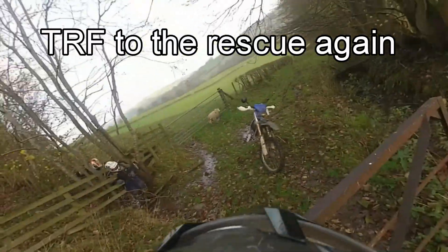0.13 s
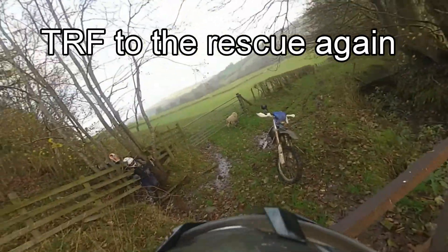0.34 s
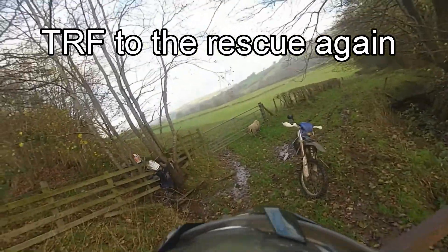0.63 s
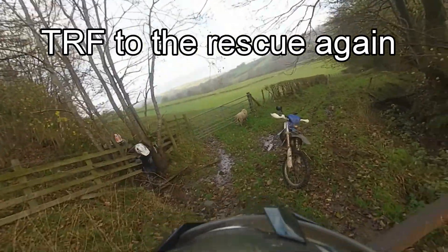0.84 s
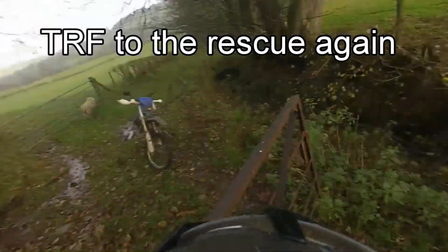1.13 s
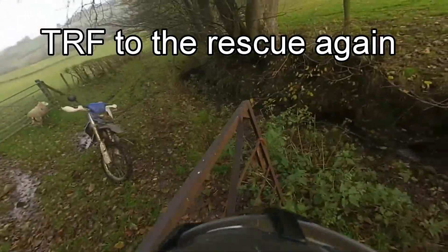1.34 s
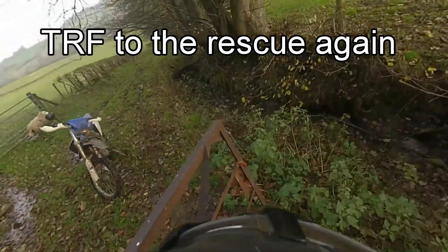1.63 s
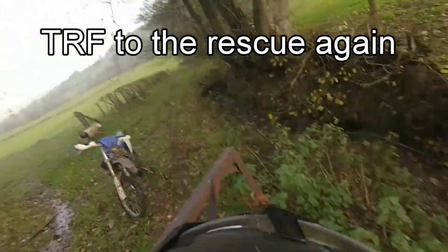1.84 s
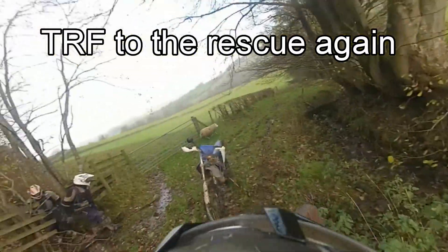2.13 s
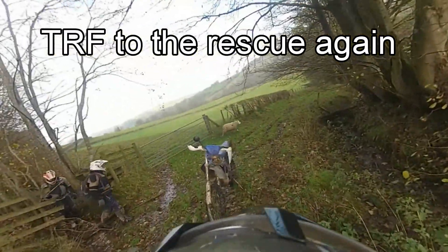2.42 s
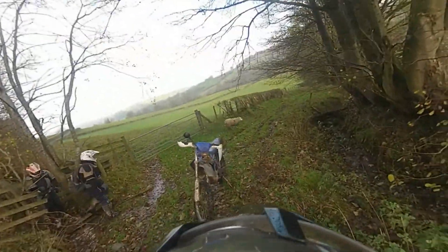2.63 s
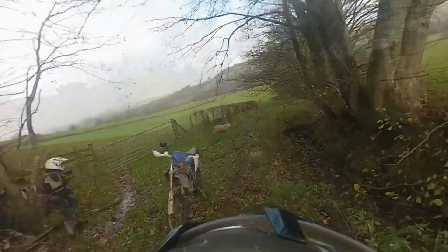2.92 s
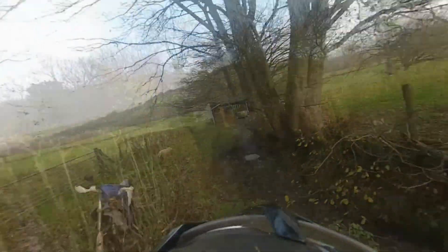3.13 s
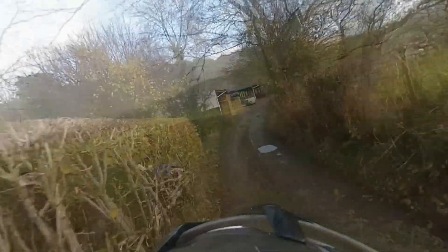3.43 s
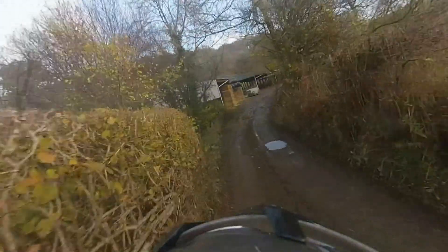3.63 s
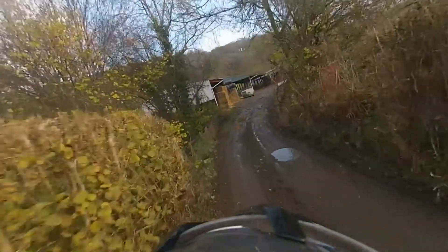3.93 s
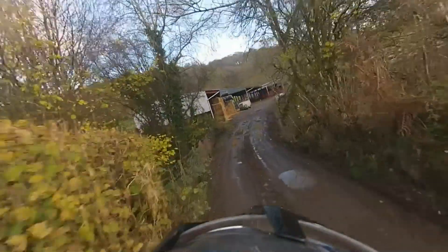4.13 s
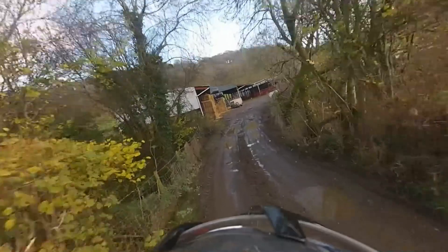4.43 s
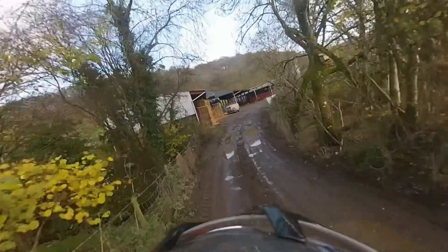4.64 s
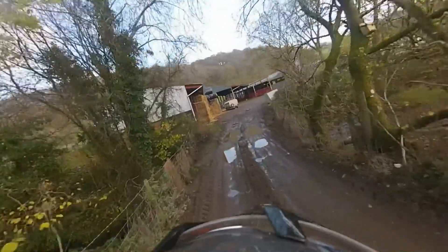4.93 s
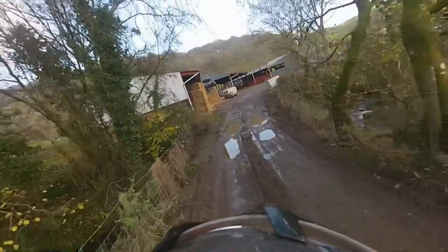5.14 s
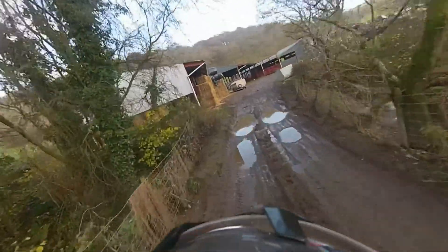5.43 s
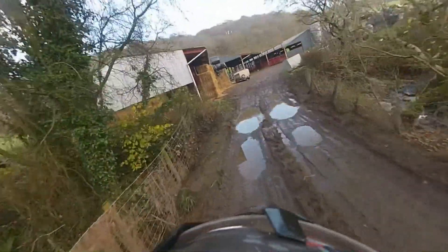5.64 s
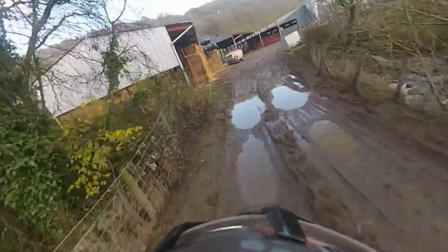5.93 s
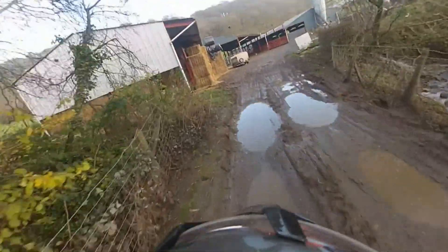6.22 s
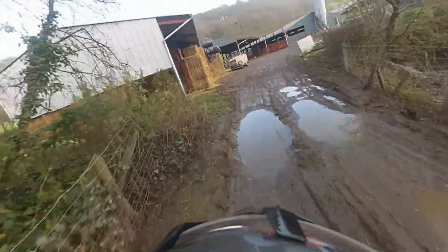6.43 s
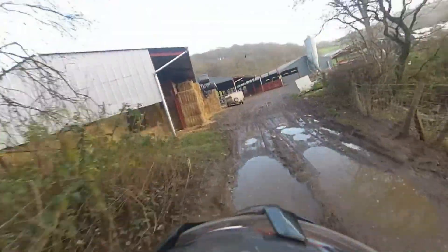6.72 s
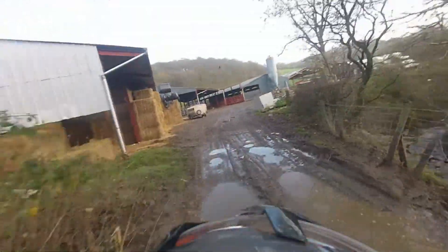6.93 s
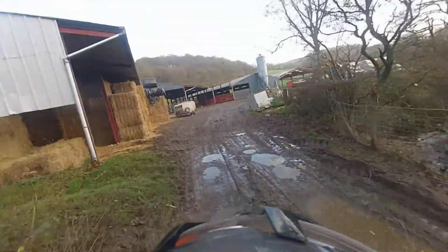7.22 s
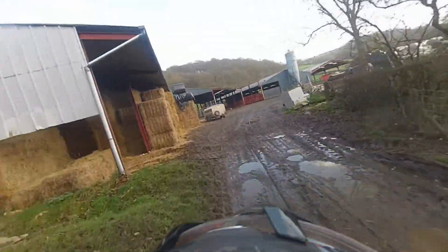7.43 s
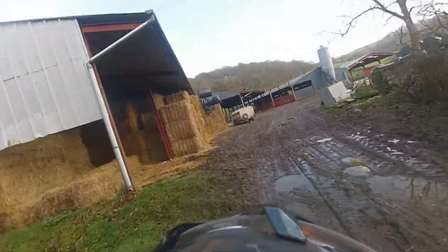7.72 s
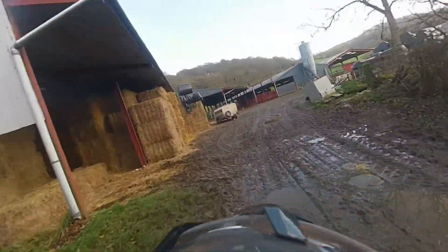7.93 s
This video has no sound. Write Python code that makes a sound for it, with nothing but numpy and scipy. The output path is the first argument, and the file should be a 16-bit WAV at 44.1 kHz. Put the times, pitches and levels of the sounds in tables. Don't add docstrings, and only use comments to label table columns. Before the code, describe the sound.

Outdoors, close to the rider, a lean single-cylinder engine idles with weak and missed beats, about seventeen puffs a second. A smooth blend brings the same engine pulling slowly along a muddy lane, faster at around twenty beats a second, brighter and much louder, with rattling cases, hiss and lumpy wind. The helmet camera in its box gives a mono, boxy, lo-fi tone that ends without the engine stopping.

```python
import sys
import numpy as np
from scipy import signal
from scipy.fft import rfft, irfft, next_fast_len
from scipy.io import wavfile
from scipy.ndimage import uniform_filter1d, map_coordinates

SR = 44100
rng = np.random.default_rng(int(sys.argv[2]) if len(sys.argv) > 2 else 0)


def amplitude_ratio(level_db):
    exponent = np.asarray(level_db, float) / 20
    return 10 ** exponent


def store_pcm(level_fs):
    pcm = np.round(np.clip(level_fs, -1, 1) * 32767).astype(np.int16)
    wavfile.write(sys.argv[1], SR, np.atleast_2d(pcm).T)


N = 355887

# time in seconds, engine cycles done.
IDLE_CRANK = [(-0.013, 0), (0.29, 5), (0.931, 16), (1.167, 20), (1.42, 24), (1.606, 27), (2.392, 40),
              (3.408, 57)]
RIDE_CRANK = [(2.945, 0), (4.064, 23), (4.654, 35), (5.313, 48), (5.785, 57), (6.106, 63), (6.44, 69),
              (6.709, 74), (6.876, 77), (7.288, 84), (8.082, 98)]
# time in seconds, loss in dB.
IDLE_MISFIRES = [(-0.013, 17), (0.108, 6), (0.408, 9), (0.698, 9.5), (0.931, 2), (1.048, 1), (1.229, 14),
                 (1.356, 16.5), (1.726, 2.5), (2.03, 11), (2.392, 19.5), (2.513, 3.5), (2.929, 13)]
RIDE_MISFIRES = [(3.091, 2), (3.189, 4.5), (3.286, 4.7), (3.384, 3.3), (3.432, 7.4), (3.578, 3.5),
                 (3.627, 4.1), (3.724, 11), (3.822, 13), (3.92, 3), (3.969, 8), (4.114, 9.4), (4.213, 7.5),
                 (4.311, 7), (4.507, 7.7), (4.605, 3.3), (4.705, 6), (4.805, 2.7), (5.008, 4.5),
                 (5.11, 5.2), (5.365, 15), (5.47, 4), (5.733, 3), (5.946, 6.5), (6.052, 1.2), (6.162, 1.5),
                 (6.327, 1.3), (6.655, 5.9), (6.764, 2), (6.934, 8.9)]
# time in seconds, load in dB.
LOAD = [(2.9, -9), (3.45, -5.5), (3.8, -1.5), (4.3, -2), (4.75, -1.5), (5.3, -2.5), (5.7, -2.5),
        (6.05, -1.5), (6.3, -1.5), (6.8, 1), (7.1, -0.5), (7.4, 1), (7.8, 1), (8.07, 0)]

# crank angle as share of a cycle, length as share of a cycle,
# pipe note in Hz, decay in seconds, level in dB, phase lead in turns.
IDLE_PUFFS = [
    (-0.048, 0.326, 126, 0.028, 2, 0.068),
    (0.2606, 0.44, 125, 0.01, 5, 0.57),
    (0.02, 0.51, 79, 0.03, -8, 0.51),
]
RIDE_THUMP = [
    (0.0017, 0.52, 170, 0.0092, -3, 0),
    (0.254, 0.4, 155.5, 0.0099, -7.5, 0.063),
    (0.011, .5, 91, 0.0077, -11.5, 0.16),
]
RIDE_RING = [
    (0.0017, .23, 257, 0.017, -3.0, 0),
    (0.2515, 0.228, 241, 0.013, -4.0, 0.0021),
    (-0.1995, 0.24, 348, 0.012, -9, 0.021),
]

# crank angle as share of a cycle, level in dB.
IDLE_KNOCKS = [(-.05, 2.5), (.125, 1)]
GEAR_KNOCKS = [(-.29, 0), (.31, -6)]
RIDE_KNOCKS = [(-.22, -2), (-.03, -6.5), (.24, 3.5), (0.398, -2.5)]
VALVE_TICKS = [(-.29, -7), (-.2, -9), (.05, -10.5), (.5, -12)]
# pitch in Hz, width in Hz (wider dies sooner), level in dB.
CASES = [(448.2, 40.4, 0), (483.4, 22.8, -6.5), (550.4, 30.3, -6), (645, 46, -20.5), (863, 20, -31.5)]
COVERS = [(555.4, 43, 1), (630, 52, -13), (846, 50, -20.5)]
HEAD = [(1100, 200, -3), (1930, 210, -3), (2155, 73, -6.5), (2840, 180, 3), (4600, 880, -21.5)]

# frequency in Hz, level in dB per Hz.
IDLE_ROAR = [(40, -20), (70, -24), (130, 2.5), (200, -24), (320, -11.5), (500, 0), (700, -16.5),
             (900, -24.5), (1100, -44)]
RIDE_ROAR = [(40, -22), (80, -3.5), (160, -1), (280, -2), (400, -6.5), (480, -6.5), (700, -15.5),
             (900, -47), (1100, -59)]
IDLE_HISS = [(470, -25), (800, -0.5), (870, 9), (962, -53), (1130, -5.5), (1730, -10), (1910, -4),
             (2870, -7.5), (3310, -11), (4590, -12.5), (5900, -25.5), (7670, -64), (13000, -120)]
RIDE_HISS = [(470, -30), (800, 0), (884, 1.5), (994, -6), (1320, -1.5), (1510, -4.5), (2430, -3), (2850, 2),
             (3570, -7.5), (4750, -6.5), (5900, -21.5), (7670, -57), (13000, -120)]

# time in seconds, rise of the hiss in dB.
JOLTS = [(1.65, 5), (2.67, 2), (4.76, 1.5), (6.07, 1), (7.64, 1.5), (7.77, 3.5)]
# time in seconds, level in dB.
WIND = [(0.0, -53), (0.85, -68), (1.06, -44), (1.26, -61), (2.13, -78), (2.22, -48), (2.4, -60),
        (2.85, -62), (3.5, -42.5), (5.15, -40.5), (5.53, -39), (5.68, -46), (5.91, -43), (6.5, -56),
        (6.94, -47), (7.3, -60), (7.8, -40), (8.07, -49)]
# time in seconds, share of the riding scene.
FADE = [(2.83, 0.035), (3.42, 0.96)]


def in_time(rows):
    s, *columns = np.transpose(rows)
    return [np.interp(np.arange(N) / SR, s, column) for column in columns]


def rms_one(x):
    return x / np.sqrt(np.mean(x ** 2) + 1e-20)


def coloured(spectrum):
    hz, db = np.transpose(spectrum)
    size = next_fast_len(N)
    log_hz = np.log(np.arange(size // 2 + 1) * SR / size + 1)
    gain = amplitude_ratio(np.interp(log_hz, np.log(hz), db))
    return rms_one(irfft(rfft(rng.standard_normal(size)) * gain, size)[:N])


def drift(rate):
    points = rng.standard_normal(int(N / SR * rate) + 2)
    return map_coordinates(points, [np.arange(N) / SR * rate], order=3)


def firing(crank, misfires, burn_db, uneven_db):
    at, done = np.transpose(crank)
    s = np.interp(np.arange(done[-1] + 1), done, at)
    loss = np.zeros(len(s))
    for when, loss_db in misfires:
        loss[np.argmin(abs(s - when))] = loss_db
    loss_before = np.r_[0, loss[:-1]]
    rebound = np.minimum(0.083 * loss_before, 2) * (loss == 0)
    return np.c_[s, burn_db(s) - loss + rebound + uneven_db * rng.standard_normal(len(s))]


def relative_strength(burn_db):
    return burn_db - uniform_filter1d(burn_db, size=9)


def throb(burns, centre, sharp, floor_db, follow):
    s, db = np.transpose(burns)
    turns, = in_time(np.c_[s, np.arange(len(s))])
    nearest = np.clip(np.round(turns - centre).astype(int), 0, len(s) - 1)
    burn = relative_strength(db)[nearest]
    swell = np.exp(sharp * (np.cos(2 * np.pi * (turns - centre)) - 1))
    return rms_one(amplitude_ratio(floor_db) + amplitude_ratio(follow * burn) * swell)


def exhaust(burns, puffs, level_db, scatter):
    out = np.zeros(N + 2 * SR)
    t = np.arange(SR // 20) / SR
    s, db = np.transpose(burns)
    luck = scatter * rng.standard_normal((len(s), len(puffs), 3))
    for at, burn_db, cycle, chances in zip(s, db, np.gradient(s), luck):
        for puff, (late, sharp, loud) in zip(puffs, chances):
            share, lasts, hz, decay, puff_db, lead = puff
            choke = np.clip((lasts * cycle - t) / 0.004 + 0.5, 0, 1)
            shape = (1 - np.exp(-t / 0.0015)) ** 2 * np.exp(-t / decay) * choke
            pipe_hz = hz * (1 + 0.033 * sharp)
            wave = np.cos(2 * np.pi * (pipe_hz * (t - 0.0026) + lead))
            start = at + share * cycle * (1 + 0.023 * late) - 0.0022
            i = int(start * SR) + SR
            out[i:i + len(t)] += amplitude_ratio(burn_db + puff_db + 2.0 * loud) * shape * wave
    return amplitude_ratio(level_db) * out[SR:SR + N]


def resonance(x, hz, width):
    r = np.exp(-np.pi * width / SR)
    top = [(1 - r * r) / 2, 0, (r * r - 1) / 2]
    return signal.lfilter(top, [1, -2 * r * np.cos(2 * np.pi * hz / SR), r * r], x)


def struck(burns, knocks, modes, jitter, spread_db, follow):
    s, db = np.transpose(burns)
    share, knock_db = np.transpose(knocks)
    at = s[:, None] + share * np.gradient(s)[:, None]
    at = at + jitter * rng.standard_normal(at.shape)
    place = np.clip(at * SR, 0, N).astype(int).ravel()
    burn_part = follow * relative_strength(db)[:, None] * (share > -0.1)
    out = 0
    for hz, width, mode_db in modes:
        size = amplitude_ratio(knock_db + burn_part + spread_db * rng.standard_normal(at.shape))
        clicks = np.bincount(place, size.ravel(), N + 1)[:N] + 1e-18
        softened = resonance(clicks, hz, 4 * width)
        out = out + amplitude_ratio(mode_db) * rms_one(resonance(softened, hz, width))
    return rms_one(out)


def hiss(burns, spectrum, tick, depth_db, ticks_db):
    grains = amplitude_ratio(4.0 * np.minimum(rng.exponential(1, N // 200 + 1), 5)).repeat(200)[:N]
    texture = rms_one(1 + amplitude_ratio(ticks_db) * uniform_filter1d(grains, size=150))
    swell = throb(burns, tick, 3.3, depth_db, 0.43)
    return coloured(spectrum) * texture * swell * amplitude_ratio(0.47 * drift(12))


def idle(clatter_db, roar_db, hiss_db):
    burns = firing(IDLE_CRANK, IDLE_MISFIRES, lambda s: -30.5, uneven_db=0.5)
    pipe = exhaust(burns, IDLE_PUFFS, level_db=2.7, scatter=0.11)
    gear = struck(burns, GEAR_KNOCKS, COVERS, jitter=0.0003, spread_db=1.5, follow=0.1)
    knocks = struck(burns, IDLE_KNOCKS, CASES, jitter=0.0002, spread_db=1.5, follow=0.4)
    shake = amplitude_ratio(-9.0) * coloured(IDLE_ROAR[4:]) * throb(burns, 0.04, 1.2, -12, 0.22)
    clatter = amplitude_ratio(clatter_db - 1) * (knocks + 0.7 * gear + shake)
    roar = amplitude_ratio(roar_db - 2.5) * coloured(IDLE_ROAR) * throb(burns, 0.08, 2.2, -8, 0.5)
    ticks = amplitude_ratio(-10.5) * struck(burns, VALVE_TICKS, HEAD, jitter=0.00099, spread_db=2.5, follow=0.1)
    head = ticks + hiss(burns, IDLE_HISS, tick=-0.21, depth_db=8.6, ticks_db=-19)
    return pipe + clatter + roar + amplitude_ratio(hiss_db) * head


def wind(wind_db):
    rumble = coloured([(12, -27), (25, 0.5), (45, 1), (60, 5), (120, -12), (300, -71)])
    return amplitude_ratio(wind_db + 1.1 * drift(14)) * rumble


def ride(clatter_db, roar_db, hiss_db):
    load_db, = in_time(LOAD)
    load_s, load_points = np.transpose(LOAD)
    burns = firing(RIDE_CRANK, RIDE_MISFIRES,
                   lambda s: -19 + 0.8 * np.interp(s, load_s, load_points), uneven_db=0.7)
    thump = exhaust(burns, RIDE_THUMP, level_db=-0.5 * load_db + 2.4, scatter=0.5)
    ring = exhaust(burns, RIDE_RING, level_db=1.37 * load_db + 6.0, scatter=0.4)
    knocks = struck(burns, RIDE_KNOCKS, CASES, jitter=0.00094, spread_db=3.4, follow=0.2)
    clatter = amplitude_ratio(clatter_db + 0.95 * load_db - 2) * knocks
    roar = coloured(RIDE_ROAR) * throb(burns, 0.2, 1.3, 1.5, 0.55)
    roar = amplitude_ratio(roar_db + 0.3 * load_db - 1.0) * roar
    ticks = amplitude_ratio(-14.5) * struck(burns, VALVE_TICKS, HEAD, jitter=0.003, spread_db=5.8, follow=0.84)
    head = ticks + hiss(burns, RIDE_HISS, tick=0.23, depth_db=12.7, ticks_db=-21.5)
    return thump + ring + clatter + roar + amplitude_ratio(hiss_db + 1.14 * load_db) * head


def scene():
    t = np.arange(N) / SR
    jolt_s = 0.024
    jolt_db = sum(db * np.exp(-0.5 * ((t - s) / jolt_s) ** 2) for s, db in JOLTS)
    still = idle(clatter_db=-43, roar_db=-36, hiss_db=-55 + jolt_db)
    moving = ride(clatter_db=-37.5, roar_db=-29.5, hiss_db=-42.5 + jolt_db)
    fade = np.clip(in_time(FADE)[0], 0, 1)
    mix = np.sqrt(1 - fade) * still + np.sqrt(fade) * moving
    return (mix + wind(in_time(WIND)[0]))[None]


def sample_and_hold(x):
    hold_hz, cutoff_hz = 12000, 15300
    size = next_fast_len(N)
    hz = np.arange(size // 2 + 1) * SR / size
    low_pass = np.clip((hold_hz / 2 - hz) / 400, 0, 1)
    make_up = np.sinc(np.minimum(hz / hold_hz, 0.5))
    base = irfft(rfft(x, size) * low_pass / make_up, size)
    sampled = base * (1 + 2 * np.cos(2 * np.pi * hold_hz * np.arange(size) / SR))
    return irfft(rfft(sampled) * np.sinc(hz / hold_hz) * (hz < cutoff_hz), size)[:, :N]


def roll_off(x):
    return signal.sosfilt(signal.butter(12, 16570, fs=SR, output="sos"), x)


def record(dry):
    held = sample_and_hold(dry)
    return roll_off(held)


dry = scene()
out = record(dry)
store_pcm(out)
```